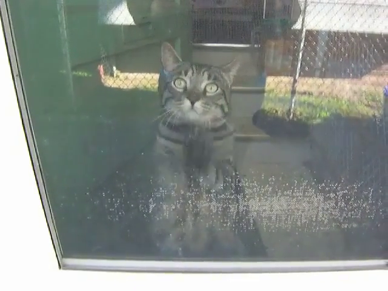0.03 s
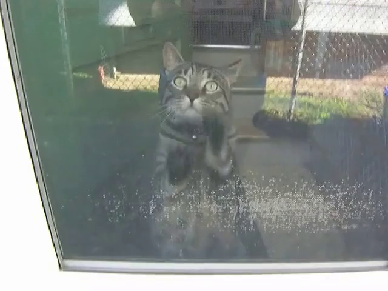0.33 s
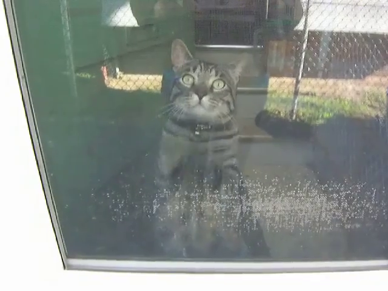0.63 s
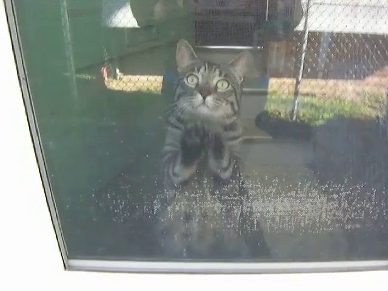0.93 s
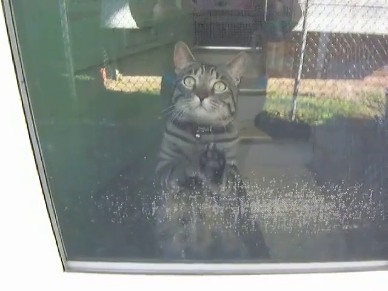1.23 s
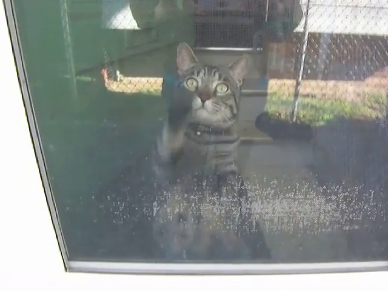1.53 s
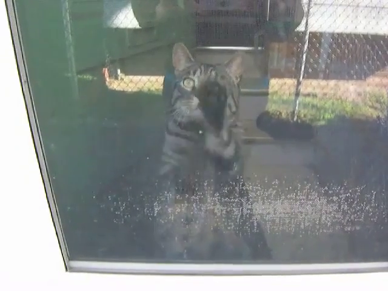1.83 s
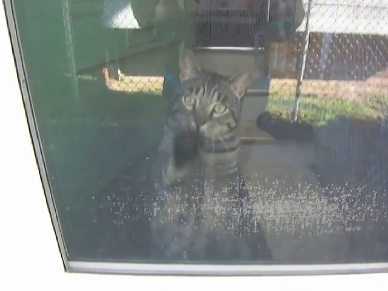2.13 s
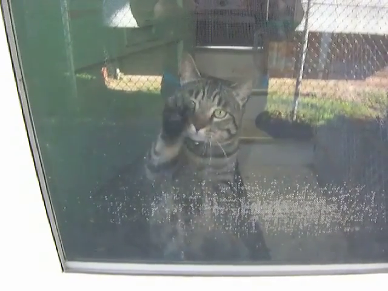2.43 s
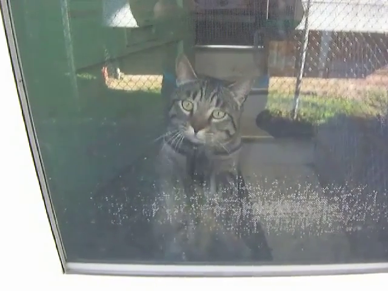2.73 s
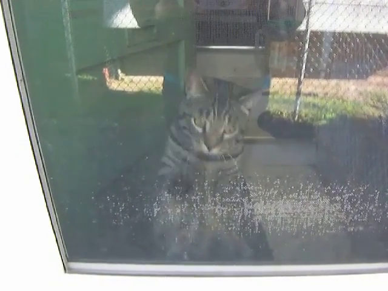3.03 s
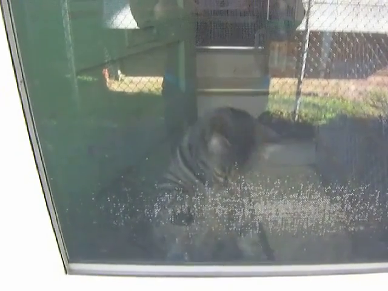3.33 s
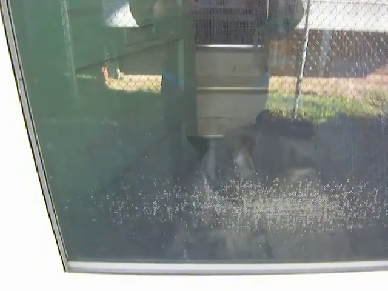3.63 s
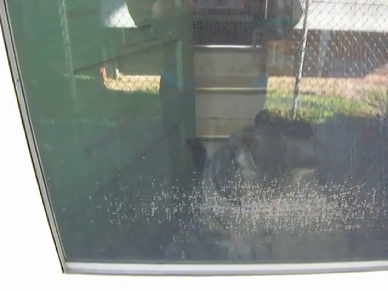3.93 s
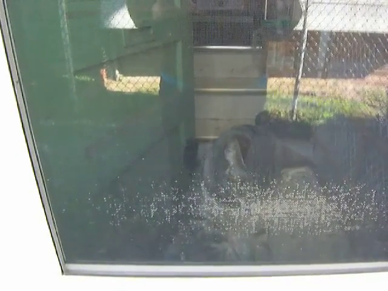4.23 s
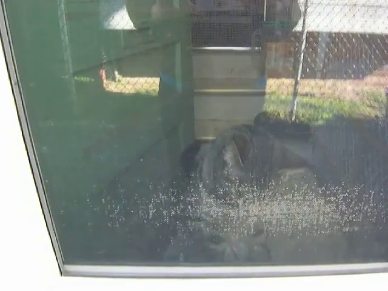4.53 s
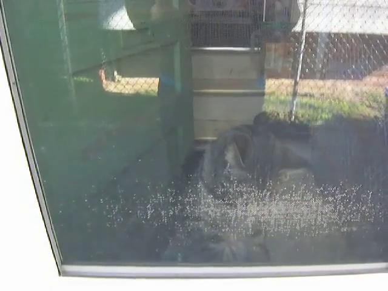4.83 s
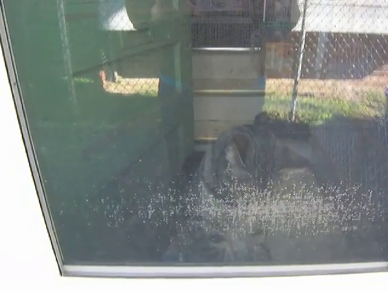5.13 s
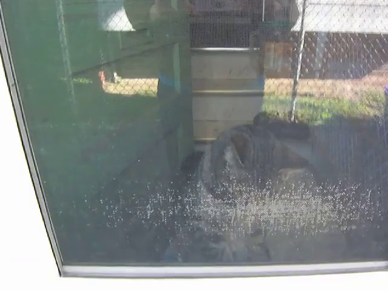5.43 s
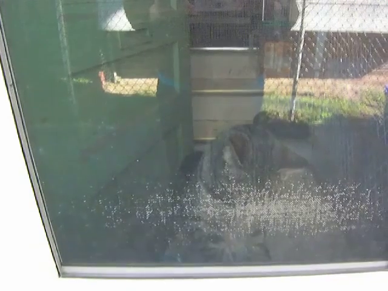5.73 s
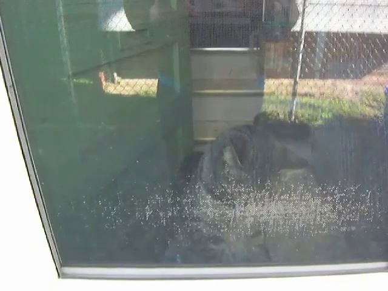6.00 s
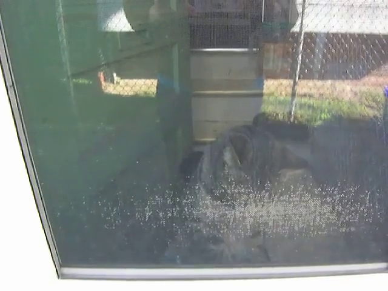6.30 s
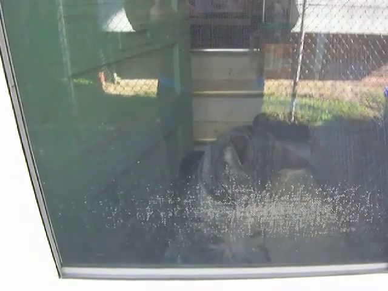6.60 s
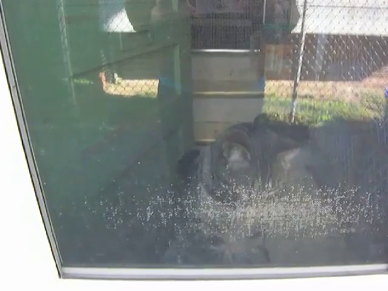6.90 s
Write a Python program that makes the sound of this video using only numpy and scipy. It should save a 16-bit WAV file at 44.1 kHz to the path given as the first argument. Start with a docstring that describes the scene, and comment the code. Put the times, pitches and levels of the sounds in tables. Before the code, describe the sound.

Claws tick on a glass pane with soft paw thumps, giving way to faint swishes, low hum and a far-off passing vehicle.

```python
"""Cat pawing at a glass door

Heard from inside a quiet room. Claws tick on the pane and set it ringing; pads thump the door
and rub the glass. After three seconds the cat settles and only faint rubs remain.
Underneath: room rumble, mains hum, hiss and the soft swell of far-off traffic."""
import sys
import numpy as np
from scipy import signal
from scipy.fft import rfft, irfft, next_fast_len
from scipy.io import wavfile

SR = 44100
rng = np.random.default_rng(int(sys.argv[2]) if len(sys.argv) > 2 else 0)


def waveform_to_disk(signal):
    """Save audio, clipped to [-1, 1], as 16-bit WAV at the path in sys.argv[1]."""
    frames = np.transpose(np.atleast_2d(signal))
    scaled = np.clip(frames, -1, 1) * 32767
    samples = np.round(scaled).astype(np.int16)
    wavfile.write(sys.argv[1], SR, samples)


N = 311346
TIME_S = np.arange(N) / SR
HIT_TIME_S = TIME_S[:SR // 4]

# room rumble and hiss: freq_hz, relative_density_db
ROOM_SPECTRUM = [(10, -7.5), (27, -1), (40, -1.5), (54, 1.5), (75, 0.5), (130, -5.5), (200, -8),
                 (280, -12.8), (450, -17), (740, -17.5), (1300, -23.5), (2100, -27.5), (3300, -29.5),
                 (4800, -32), (7000, -34)]
# mains hum, motor tones, thin electrical whine: pitch_hz, rms_db, wander_hz
HUM_TONES = [(60, -54.5, 0.4), (117.4, -55.5, 0.55), (136.5, -54, 0.6), (180.5, -59.5, 0.35),
             (237.3, -63.5, .3), (300.7, -65.5, 0.8), (360, -69, 1.2), (5254, -80.5, 1.2)]
# engine rumble: freq_hz, relative_density_db
ENGINE_SPECTRUM = [(30, -20), (58, -3), (82, 2), (125, -5.5), (165, -17), (215, -13.5), (300, -32),
                   (600, -51)]
# tyre drone: freq_hz, relative_density_db
TYRE_SPECTRUM = [(200, -13), (400, -7.5), (620, -0.5), (740, 4.5), (810, -4.5), (960, -9), (1100, -0.5),
                 (1300, -11.5), (1700, -9.5), (3500, -29)]
# far-off vehicles: nearest_s, fade_3db_s, engine_db, tyre_db, engine_speed_ratio
FAR_VEHICLES = [(1.75, 0.28, -47.5, -71, 1.55), (3.501, 1.56, -54.5, -61, 1),
                (6.299, 0.5, -58.5, -63.5, 1.7)]
# course of the nearest vehicle: time_s, whine_hz, whine_db, engine_db
NEAREST_PASS = [(2.101, 832.4, -77, -59), (2.651, 780.7, -62.5, -49), (3.1, 754, -59.5, -46.5),
                (3.45, 747, -59, -50), (3.7, 738, -64.5, -44), (3.95, 724, -59, -48.5),
                (4.13, 722, -66, -51.5), (4.33, 706, -55.5, -48.5), (4.6, 681, -67.5, -54),
                (5.1, 665, -82, -62.5)]
# pads and fur sliding on glass: middle_s, half_length_s, level_db, centre_hz, width_hz
RUB_STROKES = [(2.09, 0.25, -64, 4600, 1200), (3.736, 0.094, -68.5, 3440, 395),
               (3.94, .05, -68.5, 3470, 350), (4.14, 0.11, -69, 4670, 1200), (4.23, 0.075, -66, 3320, 400),
               (4.657, 0.066, -72, 3260, 500), (5.343, 0.089, -66, 3380, 606), (5.88, .05, -67, 3920, 1000),
               (6.686, 0.088, -70, 3400, 800), (6.739, .009, -61, 3950, 500)]
# low modes of the door: pitch_hz, relative_db, t60_s
DOOR_MODES = [(114, -1.5, 0.12), (231.5, -3, 0.11), (369, 2, 0.049), (500.6, -6.5, 0.15)]
# modes of pane and frame: pitch_hz, relative_db, t60_s
PANE_MODES = [(840, -9, 0.17), (1116, -6.5, 0.11), (1366, -9, 0.11), (1609, -5, 0.06), (1810, -5.5, 0.043),
              (2019, -1.5, 0.036), (2230, -11.5, 0.061), (2296, -8, 0.049), (2578, -2.5, 0.053),
              (2765, -2.5, 0.034), (2890, -10, 0.033), (2997, 0.5, 0.036), (3230, -3.5, 0.033),
              (3410, -6.5, 0.024), (3630, -5, 0.027), (3830, -6.5, 0.042), (3990, -6, 0.026),
              (4260, -8.5, 0.049), (4520, -15.5, 0.037)]
# dry crack of a claw: freq_hz, relative_density_db
CRACK_SPECTRUM = [(400, -24), (900, -9), (1600, -9), (2900, -12.5), (4000, -10.5), (5000, -12.5),
                  (7500, -26)]
# paw strokes: start_s, claw_db, tilt_db_per_octave, top_hz, crack_vs_ring_db, landing_s,
# pad_db, pad_spot_hz, claw_spot_peaks [(pitch_hz, boost_db)]
PAW_STROKES = [(0.1832, -40.5, 2, 4800, -12, .0005, -46, 490, [(2000, 5.5), (3220, 3), (3620, 4.5)]),
               (0.4126, -49.5, 5, 4200, -7, .0009, -61, 490, [(2700, -1), (2930, 3), (3620, 6)]),
               (0.7752, -39.5, 3, 4380, -10, 0.00064, -39.5, 366, [(2570, 8.5), (3020, 2), (3380, 6.5)]),
               (1.6079, -39.5, 4.5, 4580, -12, 0.0009, -43.5, 492, [(2015, 8.5), (2680, 7), (3320, 14.5)]),
               (1.8516, -50, 5, 5200, -6, .0004, -50, 490, [(2600, -1), (3030, -1), (4000, 5)]),
               (2.0643, -45, -0.5, 3870, -8, 0.0014, -45, 490, [(2040, 8.5), (2830, 4), (3130, 4)]),
               (2.2840, -45, 2.5, 5100, -0.5, .0009, -44, 500, [(1810, 5), (2250, 13), (2560, 5),
               (4450, 5)]), (2.4386, -47, 2, 4400, -9, .0007, -47.5, 238, [(2030, 5.5), (2600, 4),
               (3170, 3)]), (2.88, -47.3, 0.5, 3960, -8, .0009, -56, 500, [(2230, 6), (2980, 8),
               (3620, -1)]), (3.0700, -49, 1, 3800, -4, .001, -54, 490, [(1620, 9), (1800, 11), (2640, 6)])]
# lighter claw touches as a paw lands, rolls on and lifts: start_s, level_db
LIGHT_TOUCHES = [(.211, -61), (.429, -59.5), (.444, -60), (.470, -60), (.810, -62), (.858, -67),
                 (1.638, -65), (1.678, -62), (2.060, -58), (2.076, -59), (2.2805, -50.5), (2.2920, -50),
                 (2.300, -63), (2.371, -62), (2.433, -59), (2.4435, -57), (2.451, -52.5), (2.8715, -62),
                 (2.876, -52), (2.8845, -55), (2.8905, -54), (3.074, -54)]


def from_db(db):
    """Decibels to gain."""
    return 10 ** (np.asarray(db) / 20)


def unit_rms(x):
    """Scale to rms 1."""
    return x / np.sqrt(np.mean(x ** 2) + 1e-20)


def unit_attack(hit):
    """Scale to rms 1 over the first 10 ms."""
    return hit / np.sqrt(np.mean(hit[:SR // 100] ** 2))


def noise(spectrum, size=N):
    """Coloured noise, rms 1."""
    hz, db = np.transpose(spectrum)
    padded = next_fast_len(size, True)
    bins_hz = np.maximum(np.fft.rfftfreq(padded, 1 / SR), 1)
    gain = from_db(np.interp(np.log(bins_hz), np.log(hz), db))
    white = rng.standard_normal(padded)
    return unit_rms(irfft(rfft(white) * gain, padded)[:size])


def lowpass(x, order, cutoff_hz):
    """Maximally flat low-pass."""
    return signal.sosfilt(signal.butter(order, cutoff_hz, fs=SR, output="sos"), x)


def drift(rate_hz):
    """Random wander, spread near 1."""
    knots = rng.standard_normal(int(TIME_S[-1] * rate_hz) + 2)
    return np.interp(TIME_S * rate_hz, np.arange(len(knots)), knots)


def decay(t60_s):
    """Envelope falling 60 dB in t60_s."""
    return np.exp(-np.log(1000) * HIT_TIME_S / t60_s)


def add(out, start_s, sound):
    """Mix a sound in at start_s."""
    start = int(start_s * SR)
    out[start:start + len(sound)] += sound[:N - start]


def room(rms_db=-44.5):
    """Even rumble and hiss."""
    return from_db(rms_db) * noise(ROOM_SPECTRUM)


def hum():
    """Mains and motor tones, wavering slightly in pitch."""
    out = np.zeros(N)
    for pitch_hz, rms_db, wander_hz in HUM_TONES:
        cycles = np.cumsum(pitch_hz + wander_hz * drift(rate_hz=6)) / SR + rng.random()
        out += np.sqrt(2) * from_db(rms_db) * np.sin(2 * np.pi * cycles)
    return out


def passing(nearest_s, fade_3db_s):
    """Gain of a source on a straight road: one over distance."""
    return 1 / np.hypot(1, (TIME_S - nearest_s) / fade_3db_s)


def traffic(tyre_lead_s=0.13):
    """Vehicles swell and recede; tyres peak before the exhaust, which points backwards."""
    out = np.zeros(N)
    for nearest_s, fade_3db_s, engine_db, tyre_db, speed_ratio in FAR_VEHICLES:
        engine = noise([(hz * speed_ratio, db) for hz, db in ENGINE_SPECTRUM])
        out += from_db(engine_db) * passing(nearest_s, fade_3db_s) * engine
        out += from_db(tyre_db) * passing(nearest_s - tyre_lead_s, fade_3db_s) * noise(TYRE_SPECTRUM)
    return out


def nearest_vehicle(whine_width_hz=150, fade_db_per_s=19):
    """A narrow band of tyre noise glides down over engine rumble; both fade in and out."""
    times_s, *columns = np.transpose(NEAREST_PASS)
    whine_hz, whine_db, engine_db = [np.interp(TIME_S, times_s, column) for column in columns]
    outside_s = np.abs(TIME_S - np.clip(TIME_S, times_s[0], times_s[-1]))
    in_phase, quadrature = lowpass(rng.standard_normal((2, N)), 2, whine_width_hz / 2)
    phase = 2 * np.pi * np.cumsum(whine_hz) / SR
    whine = from_db(whine_db) * unit_rms(in_phase * np.cos(phase) + quadrature * np.sin(phase))
    engine = from_db(engine_db) * noise(ENGINE_SPECTRUM)
    return from_db(-fade_db_per_s * outside_s) * (whine + engine)


def rubs(grain_db=3.5):
    """A sliding paw gives a faint, grainy swish that swells and fades."""
    out = np.zeros(N)
    for middle_s, half_length_s, level_db, centre_hz, width_hz in RUB_STROKES:
        edges_hz = [centre_hz - width_hz / 2, centre_hz + width_hz / 2]
        band = signal.butter(2, edges_hz, "band", fs=SR, output="sos")
        swell = np.exp(-((TIME_S - middle_s) / half_length_s) ** 2)
        grainy_gain = from_db(level_db + grain_db * drift(rate_hz=150))
        out += swell * grainy_gain * unit_rms(signal.sosfilt(band, rng.standard_normal(N)))
    return out


def spot_boost_db(mode_hz, spot_hz, boost_db, width_octaves):
    """Boost for the modes that move most at the struck spot."""
    return boost_db * np.exp(-(np.log2(mode_hz / spot_hz) / width_octaves) ** 2)


def ring(modes, spread_db):
    """Struck modes; strength and sign vary at random, as with the spot hit."""
    gains = from_db(spread_db * rng.standard_normal(len(modes)))
    signs = rng.choice([-1, 1], len(modes))
    return sum(gain * from_db(db) * decay(t60_s) * np.sin(2 * np.pi * hz * HIT_TIME_S)
               for gain, (hz, db, t60_s) in zip(gains * signs, modes))


def pads(flex_hz=42, hard_pad_db=-39, hard_flex_db=-32.5, flex_db_per_pad_db=2.6):
    """Soft pads knock the door's low modes; a hard push also flexes the whole pane."""
    out = np.zeros(N)
    flex = unit_attack(-np.sin(2 * np.pi * flex_hz * HIT_TIME_S) * decay(t60_s=0.15))
    for start_s, *_, pad_db, spot_hz, _ in PAW_STROKES:
        modes = [(hz, db + spot_boost_db(hz, spot_hz, boost_db=4.5, width_octaves=0.14), t60_s)
                 for hz, db, t60_s in DOOR_MODES]
        knock = unit_attack(ring(modes, spread_db=2.0))
        flex_db = hard_flex_db + flex_db_per_pad_db * (pad_db - hard_pad_db)
        add(out, start_s, from_db(pad_db) * knock + from_db(flex_db) * flex)
    return out


def claw_tick(tilt_db_per_octave, top_hz, crack_db, landing_s, spot_peaks, tail_db=-13.5, pivot_hz=2700):
    """One claw cracks on the glass and sets it ringing; the room adds a faint tail."""
    modes = []
    for hz, db, t60_s in PANE_MODES:
        tilt_db = tilt_db_per_octave * np.log2(hz / pivot_hz)  # a sharper tip favours high modes
        spot_db = sum(spot_boost_db(hz, *peak, width_octaves=0.079) for peak in spot_peaks)
        modes.append((hz, db + tilt_db + spot_db, t60_s))
    spectrum = [(hz, db + tilt_db_per_octave * np.log2(hz / pivot_hz)) for hz, db in CRACK_SPECTRUM]
    crack = unit_attack(noise(spectrum, len(HIT_TIME_S)) * decay(t60_s=0.05))
    tail = noise(spectrum, len(HIT_TIME_S)) * decay(t60_s=0.33)
    ringing = unit_attack(ring(modes, spread_db=0.5))
    hit = ringing + from_db(crack_db) * crack + from_db(tail_db) * tail
    landing = 1 - np.exp(-HIT_TIME_S / landing_s)
    return unit_attack(lowpass(hit * landing, 6, top_hz))  # little top treble passes the pane


def claws():
    """Each stroke ticks the glass; lighter touches around it land on the same spot."""
    out = np.zeros(N)
    for start_s, claw_db, *contact, _, _, spot_peaks in PAW_STROKES:
        add(out, start_s, from_db(claw_db) * claw_tick(*contact, spot_peaks))
    for start_s, level_db in LIGHT_TOUCHES:
        nearest_stroke = min(PAW_STROKES, key=lambda stroke: abs(stroke[0] - start_s))
        _, _, *contact, _, _, spot_peaks = nearest_stroke
        add(out, start_s, from_db(level_db) * claw_tick(*contact, spot_peaks))
    return out


def scene():
    """Cat, traffic and room; same signal on both channels."""
    mono = claws() + pads() + rubs() + hum() + traffic() + nearest_vehicle() + room()
    return np.array([mono, mono])


def record(dry, rolloff_hz=7050, cutoff_hz=8150):
    """Narrow-band recorder: treble rolls off, then is cut."""
    steep_cut = signal.ellip(12, 0.1, 80, cutoff_hz, fs=SR, output="sos")
    return signal.sosfilt(steep_cut, lowpass(dry, 14, rolloff_hz))


dry = scene()
out = record(dry)
waveform_to_disk(out)
```